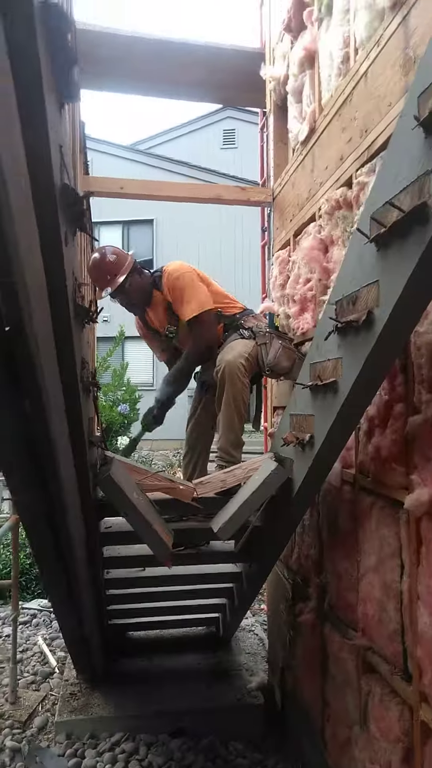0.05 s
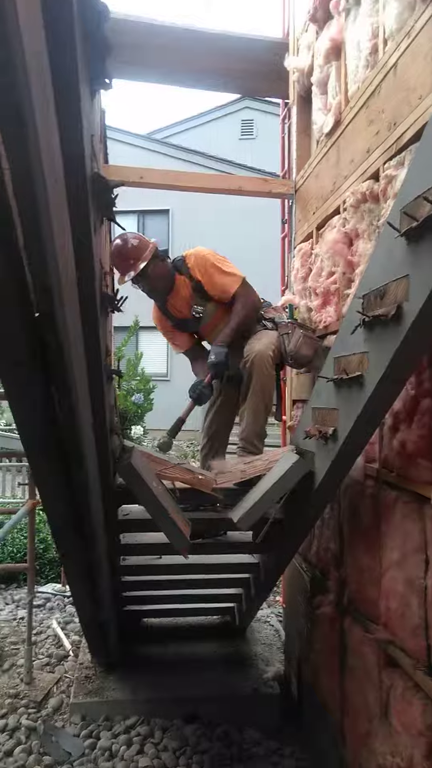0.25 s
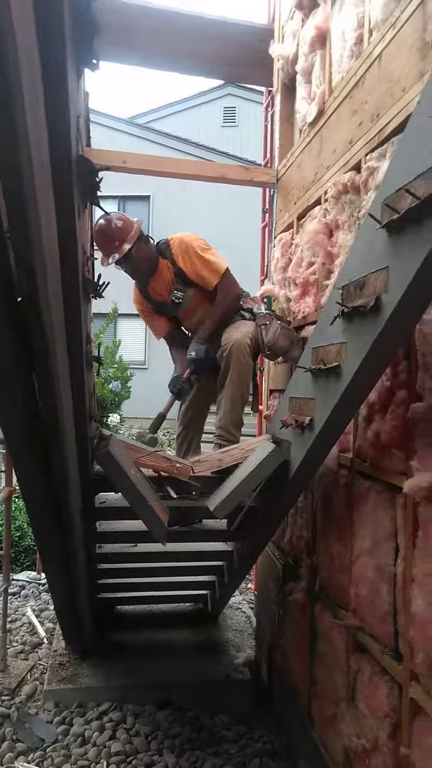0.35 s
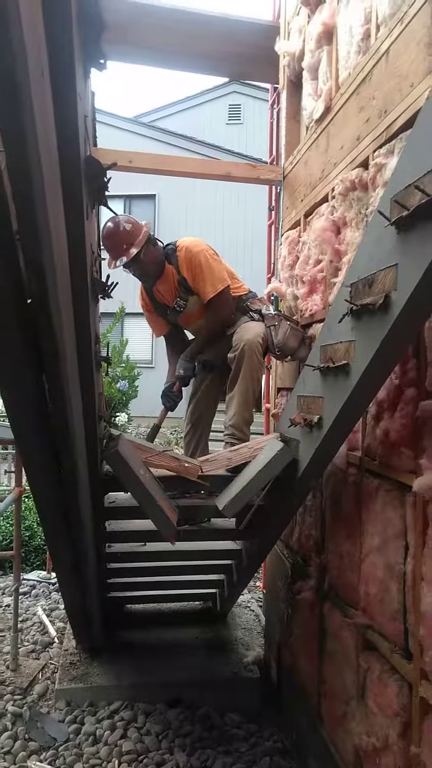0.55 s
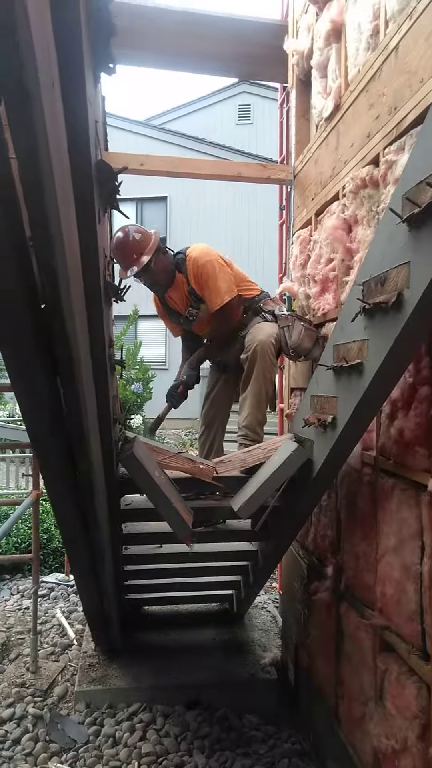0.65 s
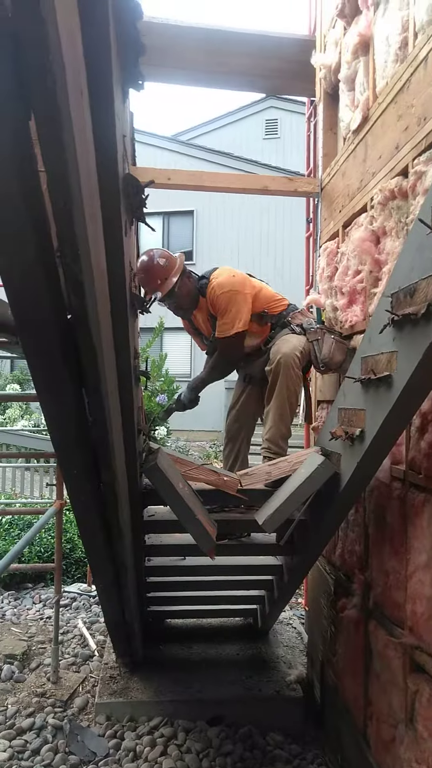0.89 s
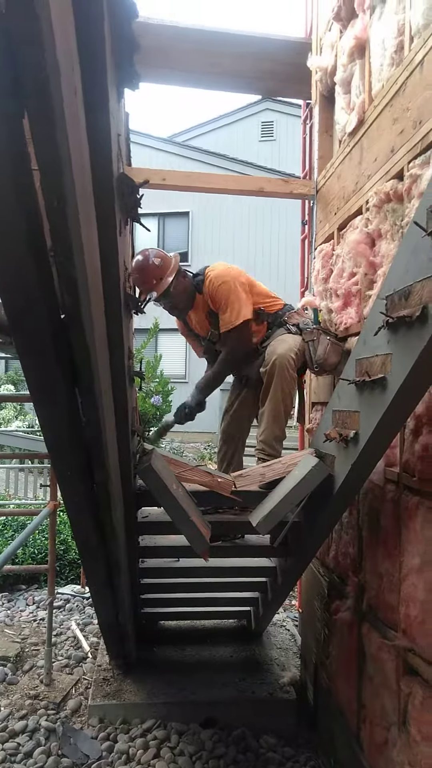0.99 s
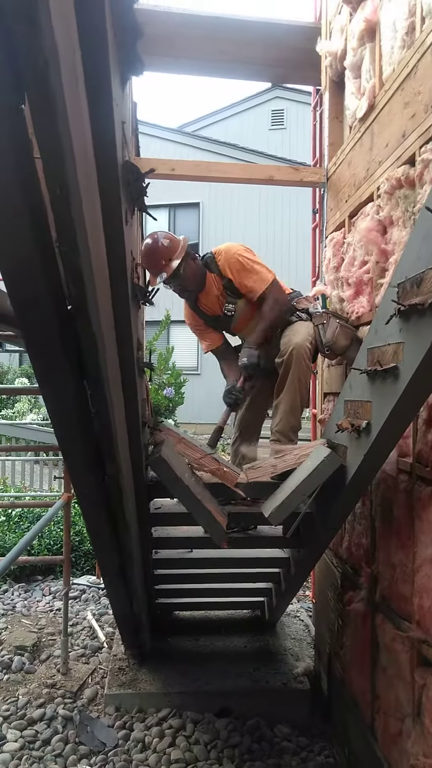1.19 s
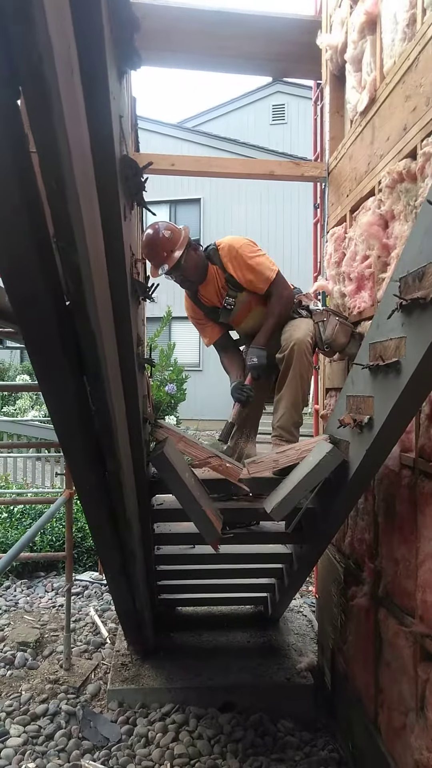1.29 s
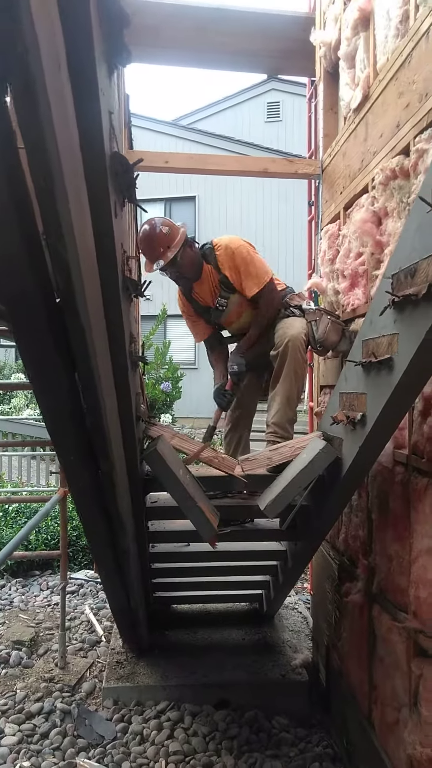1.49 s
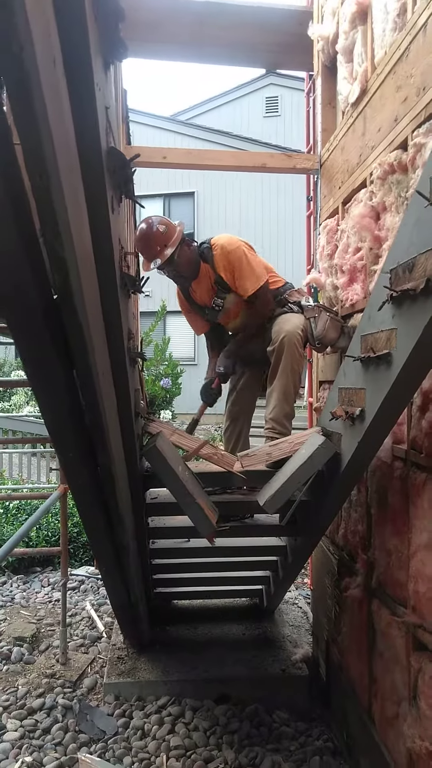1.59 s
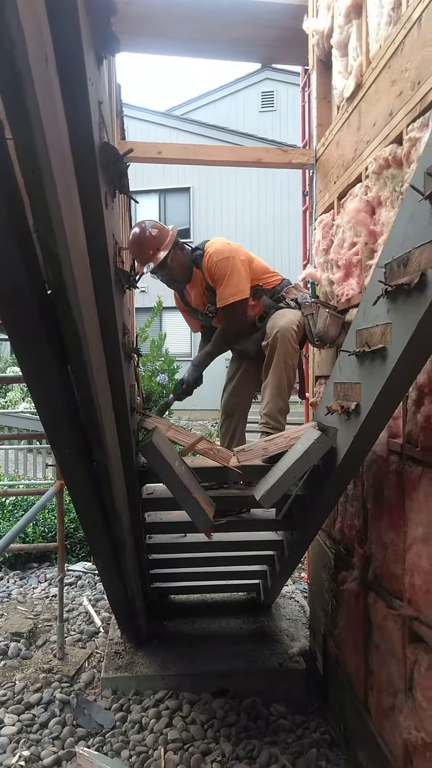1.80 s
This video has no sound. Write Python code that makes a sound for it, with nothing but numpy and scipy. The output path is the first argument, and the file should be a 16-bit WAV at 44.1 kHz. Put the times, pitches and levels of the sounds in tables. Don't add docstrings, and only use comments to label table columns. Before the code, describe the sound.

A sledgehammer lands two heavy, cracking blows on broken wooden stair treads at an outdoor building site

```python
import sys
import numpy as np
from scipy import signal
from scipy.fft import rfft, irfft, next_fast_len
from scipy.io import wavfile
from scipy.ndimage import map_coordinates

SR = 44100
rng = np.random.default_rng(int(sys.argv[2]) if len(sys.argv) > 2 else 0)


def generate_wav(signal):
    frames = np.transpose(np.atleast_2d(signal))
    scaled = np.clip(frames, -1, 1) * 32767
    pcm = np.round(scaled).astype(np.int16)
    wavfile.write(sys.argv[1], SR, pcm)


def how_loud(loudness_db):
    steps = np.asarray(loudness_db, float) / 20
    return 10 ** steps


N = 81585
T = np.arange(N) / SR
BLOWS = (0, 5)
GRAZE_LEAD_S = 0.0069


def unit(x):
    return x / np.sqrt(np.mean(x ** 2) + 1e-20)


def along(points, hz):
    point_hz, value = np.transpose(points)
    return np.interp(np.log(hz + 1), np.log(point_hz + 1), value)


def over_time(points):
    return np.interp(T, *np.transpose(points))


def noise(gain):
    m = next_fast_len(N)
    spectrum = rfft(rng.standard_normal(m)) * gain(np.fft.rfftfreq(m, 1 / SR))
    return unit(irfft(spectrum, m)[:N])


def colour(points):
    return noise(lambda hz: how_loud(along(points, hz)))


def narrow(centre_hz, wide_hz):
    return noise(lambda hz: 1 / (1 + (2 * (hz - centre_hz) / wide_hz) ** 2))


def wobble(rate_hz):
    knots = rng.standard_normal(int(N * rate_hz / SR) + 4)
    return map_coordinates(knots, [T * rate_hz])


def fade(start_s, t60, rise_s):
    t = np.maximum(T - start_s, 0)
    return how_loud(-60 * t / t60) * (1 - np.exp(-t / rise_s))


def bump(rows):
    return sum(how_loud(db) * np.exp(-((T - s) / length_s) ** 2) for s, db, length_s in rows)


def rings(rows, rise_s):
    return sum(how_loud(db) * fade(s, t60, rise_s) * np.sin(2 * np.pi * hz * (T - s))
               for s, db, hz, t60 in rows)


# frequency in Hz, level in dB.
SITE_SPECTRUM = [(15, -19.5), (60, -6), (250, -17.5), (420, -18), (800, -13.5), (1050, -6.5), (2000, -11),
                 (2300, -11)]
SITE_TOP_END = [(2300, 0), (2700, -60)]
# frequency in Hz, level in dB.
GENERATOR_HUM = [(78, -57), (160, -59.5)]
SITE_DB, SITE_DRIFT_DB = -50.5, 1.2


def site():
    hum = sum(how_loud(db + SITE_DRIFT_DB * wobble(7.4)) * np.sin(2 * np.pi * hz * T)
              for hz, db in GENERATOR_HUM)
    floor = noise(lambda hz: how_loud(along(SITE_SPECTRUM, hz) + along(SITE_TOP_END, hz)))
    return how_loud(SITE_DB + SITE_DRIFT_DB * wobble(5.6)) * floor + hum


# frequency in Hz, level in dB.
HISS_SPECTRUM = [(2300, -26), (2550, -14.5), (4000, -13.5), (5900, -15), (9000, -6), (11000, 1),
                 (13500, -5), (15750, -15)]
# time in seconds, level in dB.
HISS_EFFORT = [(0, -34.5), (.04, -33), (.2, -32.5), (.38, -32), (.48, -31), (.58, -30), (.66, -32.5),
               (.87, -32.5), (.95, -30), (1.05, -29.5), (1.13, -32), (1.37, -31), (1.55, -30), (1.7, -32),
               (1.85, -30.5)]
HISS_DRIFT_DB, HISS_FLUTTER_DB = 0.4, 0.4


def blade_hiss():
    level_db = over_time(HISS_EFFORT) + HISS_DRIFT_DB * wobble(9.94) + HISS_FLUTTER_DB * wobble(150)
    return how_loud(level_db) * colour(HISS_SPECTRUM)


# time in seconds, level in dB.
WHINE_LOAD = [(0, -63), (.5, -60), (.58, -54.5), (.8, -57.5), (.93, -54), (1.1, -58), (1.42, -59),
              (1.47, -42.5), (1.515, -37.5), (1.56, -44), (1.6, -47), (1.63, -39.5), (1.68, -49.5),
              (1.72, -48.5), (1.76, -42), (1.82, -41.5), (1.84, -50)]
# time in seconds, rotation in Hz.
SHAFT_SPEED = [(0, 167.2), (1.1, 168.3), (1.45, 167.2), (1.85, 166.2)]
# multiple of shaft speed, level in dB.
SHAFT_ORDERS = [(6, -22), (7, -18), (8, -17), (9, 0), (10.7, -15), (16, -18), (17, -16)]
WHINE_DB, WHINE_FLUTTER_DB = 3.0, 1.5
BLUR_DB, BLUR_HZ, BLUR_WIDE_HZ = -11, 1570, 140


def shaft_whine():
    shaft_hz = over_time(SHAFT_SPEED) * (1 + 0.0018 * wobble(60))
    turn = 2 * np.pi * np.cumsum(shaft_hz) / SR
    orders = sum(how_loud(db + WHINE_FLUTTER_DB * wobble(40.1)) * np.sin(k * turn + 6 * rng.random())
                 for k, db in SHAFT_ORDERS)
    blur = how_loud(BLUR_DB) * narrow(BLUR_HZ, BLUR_WIDE_HZ)
    return how_loud(over_time(WHINE_LOAD) + WHINE_DB) * (orders + blur)


# frequency in Hz, width in Hz, level in dB.
CASING_MODES = [(1070, 15.5, -57), (1950, 22, -62), (2868, 33, -61.5), (3410, 69, -60.5),
                (5320, 810, -50.5), (9650, 33, -47.5), (6670, 210, -55)]
# centre in seconds, level in dB, length in seconds.
CASING_FLARES = [(1.55, -53, .03), (1.62, -56, .03), (1.75, -53, .02), (1.83, -44, .035)]
CASING_DRIFT_DB = 1.6


def tool_casing():
    casing = sum(how_loud(db + CASING_DRIFT_DB * wobble(10.06)) * narrow(hz, wide_hz)
                 for hz, wide_hz, db in CASING_MODES)
    return casing + bump(CASING_FLARES) * narrow(1987, 63)


# centre in seconds, level in dB, length in seconds, frequency in Hz.
BLADE_BITES = [(.48, -52, .03, 1080), (.59, -48, .07, 1200), (.6, -54, .04, 3300), (.95, -49, .06, 3200),
               (1.52, -47, .05, 1450), (1.61, -51, .03, 3000), (1.83, -47, .04, 1400),
               (1.56, -52, .06, 1900), (1.7, -53, .03, 1050), (1.83, -55, .04, 650)]
BITE_Q, BITE_FLUTTER_DB = 3.5, 2.7


def bites():
    return sum(bump([(s, db, length_s)]) * how_loud(BITE_FLUTTER_DB * wobble(59.24)) * narrow(hz, hz / BITE_Q)
               for s, db, length_s, hz in BLADE_BITES)


# frequency in Hz, level in dB.
EARLIER_SPECTRUM = [(600, -17.5), (1800, -7.5), (2800, 2), (4000, -7), (9000, -5.5)]
EARLIER_DB, EARLIER_T60_S = -27.5, 0.17


def earlier_knock():
    return how_loud(EARLIER_DB - 60 * T / EARLIER_T60_S) * colour(EARLIER_SPECTRUM)


# start in seconds, level in dB, frequency in Hz, t60 in seconds.
FAR_KNOCKS = [(0, -34, 1950, 0.064), (.02, -43, 1140, 0.17), (0.104, -36, 1140, 0.063),
              (.14, -48.5, 1080, .06), (0.184, -36.5, 1270, 0.095)]


def far_knocks():
    return sum(how_loud(db) * fade(s, t60, 0.0015) * narrow(hz, 150) for s, db, hz, t60 in FAR_KNOCKS)


# centre in seconds, level in dB, length in seconds.
HEAD_SWISH = [(1.0, -60, 0.03), (1.1, -47, .03)]


def swish():
    return bump(HEAD_SWISH) * narrow(267, 40)


# start in seconds, peak level in dB.
GRIT_TICKS = [(0.429, -22), (0.484, -13), (0.5424, -7.5), (0.583, -11.5), (0.609, -21), (1.012, -20),
              (1.0657, -16)]
GRIT_DB, GRIT_T60_S, GRIT_RISE_S = -8, 0.015, 0.00078


def grit():
    ticks = sum(how_loud(db + GRIT_DB) * fade(s, GRIT_T60_S, GRIT_RISE_S) for s, db in GRIT_TICKS)
    return ticks * colour([(3000, -9.0), (9000, -0.5), (15000, 2.5)])


# start in seconds, level in dB, t60 in seconds.
SHAKE_EVENTS = [(.255, -28, .5), (.43, -39, .5), (1.27, -32, .5), (1.53, -44, .3)]
# frequency in Hz, level in dB.
SHAKE_SPECTRUM = [(8, -25), (20, -28), (55, -10), (100, -3), (146, -20), (220, -57)]
# start in seconds, level in dB, frequency in Hz, t60 in seconds.
FRAME_LURCHES = [(.262, -13, 20, .7), (.225, -25, 88, .4), (.27, -15, 38, .3), (.255, -18, 76, .5),
                 (.3, -25, 100, .45), (.445, -29, 60, .2), (.497, -29, 45, .14), (.575, -37, 35, .4),
                 (.715, -39, 40, .25), (1.221, -12, 26, .2), (1.18, -25, 98, .3), (1.228, -16, 74, .35),
                 (1.235, -17, 40, .2), (1.268, -20, 18, .9), (1.305, -23, 85, .3), (1.42, -28, 50, .15),
                 (1.525, -31, 32, .2), (1.565, -35, 45, .3)]
SHAKE_RISE_S, LURCH_RISE_S = 0.0038, 0.0043


def shake():
    rumble = sum(how_loud(db) * fade(s, t60, SHAKE_RISE_S) * colour(SHAKE_SPECTRUM)
                 for s, db, t60 in SHAKE_EVENTS)
    return rings(FRAME_LURCHES, LURCH_RISE_S) + rumble


# centre in seconds, level in dB, length in seconds, frequency in Hz.
BOARD_RATTLES = [(1.268, -23, .012, 420), (1.282, -25, .012, 310), (1.283, -23, .011, 480),
                 (1.43, -48, .025, 300), (.325, -33, .015, 520), (.4, -48, .015, 500),
                 (1.35, -45, .05, 750), (1.355, -38, .022, 385), (.247, -22, .006, 5200),
                 (.214, -23, .005, 2500), (1.172, -21, .008, 1690), (1.21, -25, .004, 6000)]
RATTLE_Q = 3.2


def rattle():
    return sum(bump([(s, db, length_s)]) * narrow(hz, hz / RATTLE_Q)
               for s, db, length_s, hz in BOARD_RATTLES)


# frequency in Hz, level in dB.
SPLINTER_SPECTRUM = [(3000, -18), (4900, -15), (5300, -4), (6300, -5.5), (8500, -0.5), (11600, 7),
                     (12150, -2.5), (12500, -38)]
SPLINTER_RISE_S, SPLINTER_T60_S, SPLINTER_FLUTTER_DB = 0.0035, 0.2, 0.64
GRAZE_DB, GRAZE_T60_S, GRAZE_RISE_S = -20.5, 0.15, 0.004


def splinters():
    burst = sum(how_loud(splinter_db) * fade(s, SPLINTER_T60_S, SPLINTER_RISE_S)
                for s, _, splinter_db, _, _ in CONTACTS)
    graze = sum(how_loud(GRAZE_DB) * fade(CONTACTS[k][0] - GRAZE_LEAD_S, GRAZE_T60_S, GRAZE_RISE_S)
                for k in BLOWS)
    return (burst * how_loud(SPLINTER_FLUTTER_DB * wobble(300)) + graze) * colour(SPLINTER_SPECTRUM)


def bracket():
    return how_loud(-22.5) * fade(0.267, 0.2, 0.0052) * narrow(5400, 500)


# start in seconds, strength in dB, splinter level in dB, tick level in dB,
# dullness in dB per octave.
CONTACTS = [
    (0.2072, 4, -13.5, -6, -2),
    (.219, 4, -11, -13, 16),
    (.238, 0.5, -12.5, -32, -0.5),
    (0.261, -12, -27, -32, -1.5),
    (0.308, -32, -27, -26, 6),
    (1.1634, 7, -5, -5, 0),
    (1.184, 2, -44, -30, 2),
    (1.197, -4.5, -21.5, -39, 1.5),
    (1.21, -3, -22, -20, 1),
    (1.262, -13, -52, -52, 3),
]
# frequency in Hz, level in dB, t60 in seconds.
TREAD_MODES = [(144.6, -4.5, 0.2), (255.2, -11.5, 0.2), (327.3, -10, 0.17), (383.2, -15.5, 0.19),
               (481.5, -6.5, 0.1), (575, -11, 0.054), (632, -13, 0.07), (912, -16.5, 0.062),
               (1202, -11.5, 0.076), (1693, -7, 0.034), (2476, -8.5, 0.044), (2815, -18.5, 0.016)]
# frequency in Hz, level in dB.
CLATTER_SPECTRUM = [(60, 1.5), (150, -9), (500, -4.5), (750, -13.5), (1050, -17.5), (2000, -19.5),
                    (4500, -22.5), (9000, -25)]
# frequency in Hz, t60 in seconds.
CLATTER_T60_S = [(80, 0.47), (300, 0.22), (1000, 0.16), (3000, 0.12), (12000, 0.022)]
# start in seconds, level in dB, frequency in Hz, t60 in seconds.
BOARD_NOTES = [(.2073, 6, 557, 0.053), (.2073, -5.5, 785, 0.077), (.2073, -4.5, 2500, 0.056),
               (.216, -0.5, 477, 0.16), (.247, -8, 322, .1), (.212, -9, 313, .1), (.268, -14, 530, 0.16),
               (.241, -13.5, 2445, 0.078), (.28, -37, 2700, 0.18), (1.164, 2.5, 482, 0.19),
               (1.195, -8.5, 168, 0.12), (1.1635, -0.5, 1680, 0.042), (1.1635, -4, 650, 0.13),
               (1.19, -9, 300, 0.14), (1.335, -34.5, 379, 0.17)]
RING_DB, CLATTER_DB, MODE_SCATTER_DB = -10, 12, 2.5
SWELL_CYCLES, PIVOT_HZ = 5.8, 298
CONTACT_S, BOARD_RISE_S = 0.003, 0.003
TICK_T60_S, TICK_TOP_HZ = 0.045, 9000


def tread():
    out, t = np.zeros(N + SR), T[:SR // 2]
    onset = 1 - np.exp(-t / CONTACT_S)
    tick_filter = signal.butter(2, TICK_TOP_HZ, fs=SR)
    for s, db, _, tick_db, dull_db in CONTACTS:
        def tilt(hz):
            return -dull_db * np.log2(np.maximum(hz / PIVOT_HZ, 1))

        ring = 0
        for hz, mode_db, t60 in TREAD_MODES:
            level_db = mode_db + tilt(hz) + MODE_SCATTER_DB * rng.normal()
            swell = 1 - np.exp(-(t * hz / SWELL_CYCLES) * hz / 480)
            ring = ring + how_loud(level_db - 60 * t / t60) * np.sin(2 * np.pi * hz * (t + s)) * swell

        f, u, z = signal.stft(rng.standard_normal(len(t)), SR, nperseg=512)
        band_db = (along(CLATTER_SPECTRUM, f) + tilt(f))[:, None]
        decay_db = -60 * u / along(CLATTER_T60_S, f)[:, None]
        clatter = signal.istft(z * how_loud(band_db + decay_db), SR, nperseg=512)[1][:len(t)]

        crack = signal.lfilter(*tick_filter, rng.standard_normal(len(t)))
        tick = how_loud(tick_db - 60 * t / TICK_T60_S) * crack
        wood = how_loud(db + RING_DB) * ring + how_loud(db + CLATTER_DB) * clatter * onset
        out[round(s * SR):][:len(t)] += wood + tick * onset
    return out[:N] + rings(BOARD_NOTES, BOARD_RISE_S)


# frequency in Hz, t60 in seconds.
YARD_T60_S = [(150, 0.62), (400, 0.44), (800, 1), (3000, .2), (12000, 0.6)]
YARD_DB = -32


def yard(x):
    f, u, z = signal.stft(rng.standard_normal(SR // 2), SR, nperseg=256)
    decay = how_loud(-60 * u / along(YARD_T60_S, f)[:, None])
    tail = signal.istft(z * decay, SR, nperseg=256)[1]
    return how_loud(YARD_DB) * signal.fftconvolve(x, tail / np.linalg.norm(tail))[:N]


def scene():
    background = site() + blade_hiss() + shaft_whine() + tool_casing() + bites()
    small = earlier_knock() + far_knocks() + swish() + grit()
    debris = shake() + rattle() + splinters() + bracket()
    blow = tread()
    low_cut = signal.butter(2, 200, "high", fs=SR)
    blow = signal.lfilter(*low_cut, blow + yard(blow))
    return (background + small + debris + blow)[None]


CLIP_TOP, CLIP_HARD = 0.47, 2.56
CLIP_OPENS, CLIP_OPEN_S = 0.75, 0.045


def overload(x):
    starts_s = [CONTACTS[k][0] for k in BLOWS]
    since_s = np.minimum(*[np.where(T >= s - GRAZE_LEAD_S, T - s, 9) for s in starts_s])
    top = CLIP_TOP * (1 + CLIP_OPENS * np.clip(since_s / CLIP_OPEN_S, 0, 1) ** 2)
    return x / (1 + np.abs(x / top) ** CLIP_HARD) ** (1 / CLIP_HARD)


def roll_off(x):
    return signal.sosfilt(signal.butter(12, 16830, fs=SR, output="sos"), x)


TOP_HZ = 15830


def record(dry):
    m = next_fast_len(N)
    passband = np.fft.rfftfreq(m, 1 / SR) < TOP_HZ
    mix = irfft(rfft(overload(dry), m) * passband, m)[:, :N]
    return roll_off(mix)


dry = scene()
out = record(dry)
generate_wav(out)
```